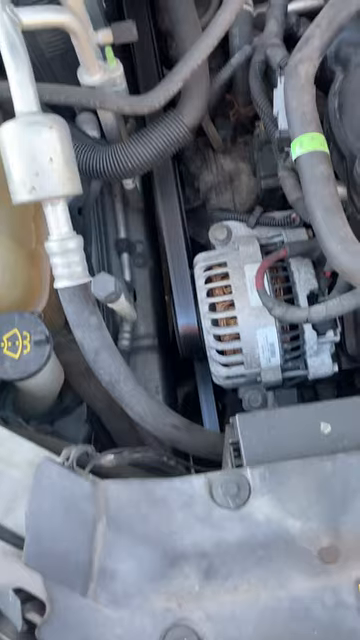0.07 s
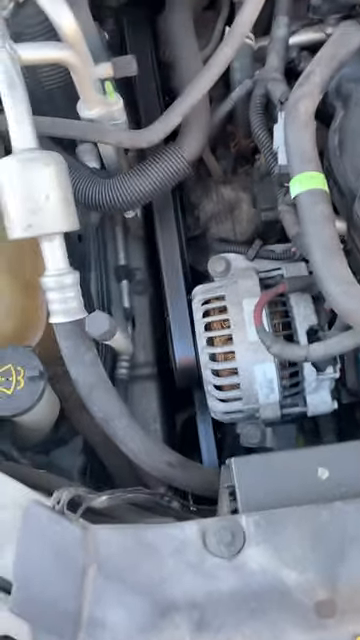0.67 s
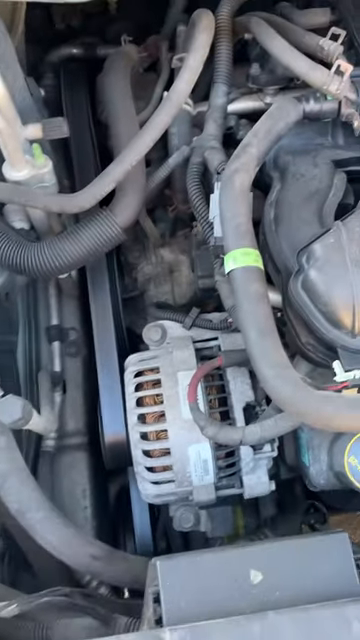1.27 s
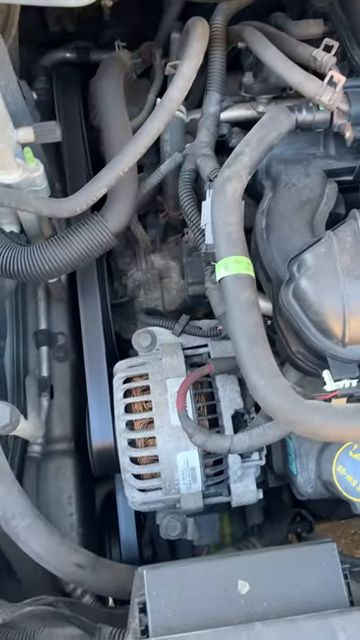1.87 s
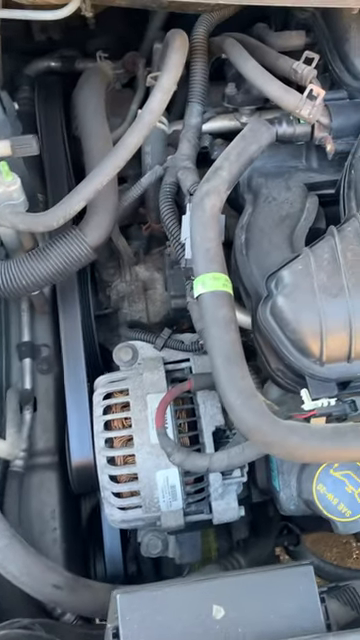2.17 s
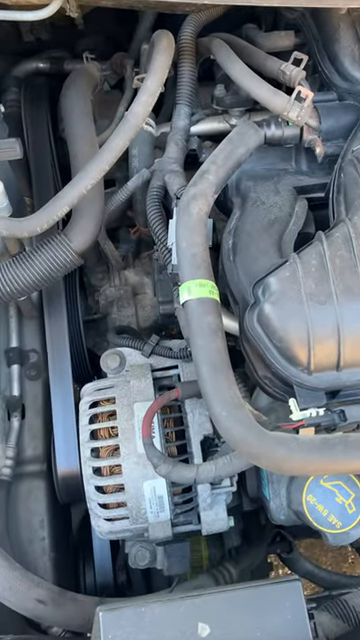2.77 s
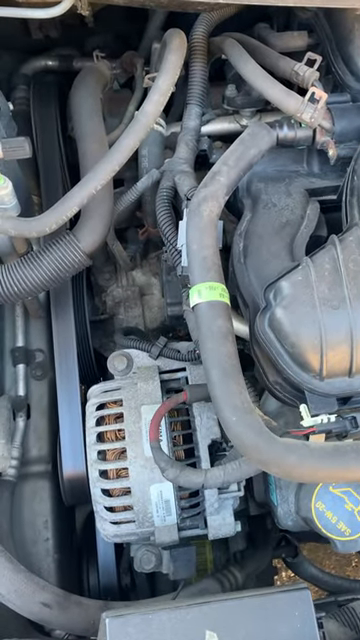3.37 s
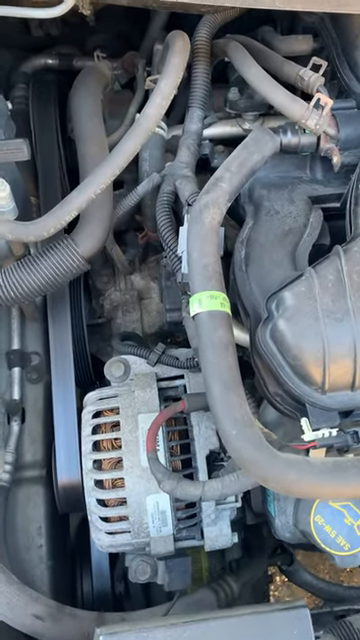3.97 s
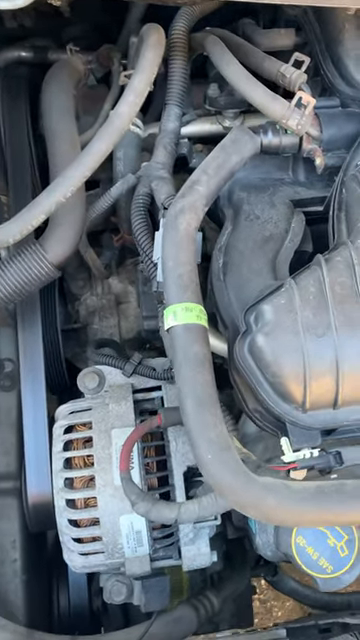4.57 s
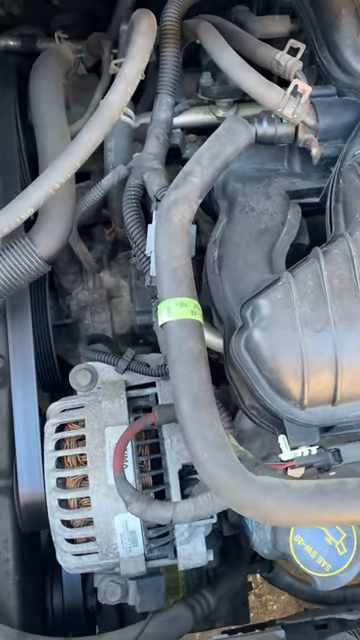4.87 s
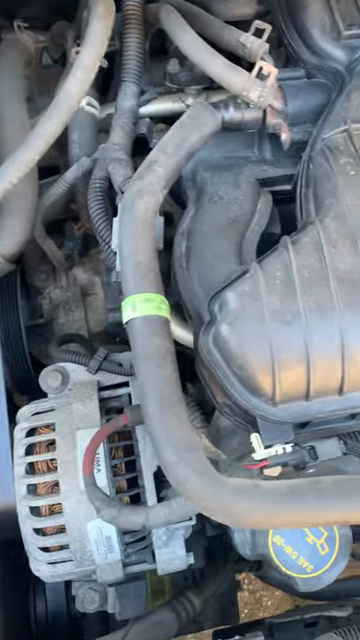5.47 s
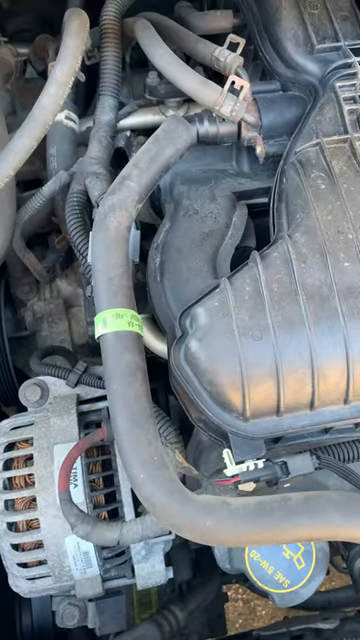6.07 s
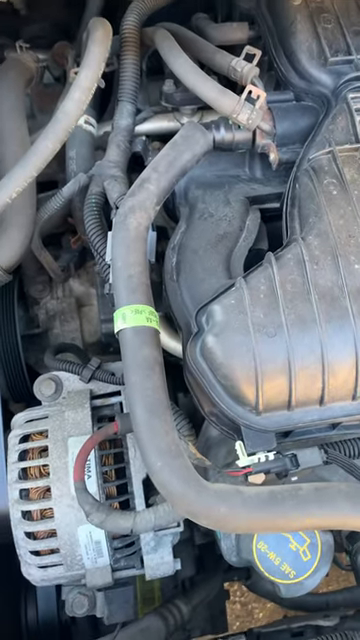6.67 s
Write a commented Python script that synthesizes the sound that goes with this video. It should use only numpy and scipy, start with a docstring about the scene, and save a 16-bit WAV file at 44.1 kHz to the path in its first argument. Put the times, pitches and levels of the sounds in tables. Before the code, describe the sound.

Close under an open hood, an idling engine knocks fast and evenly, with rhythmic belt chirps, occasional squeaks and a low fan hum.

```python
"""Idling engine with a chirping belt

A car engine idles under its open hood, heard from just above the belt drive. It knocks once per
crank turn, dull and hard strokes in turn, and each knock makes the engine block ring. In bouts the
rubber belt slips and chirps after each hard stroke, and now and then it squeaks. Behind this a
cooling fan hums and slows a little, and valves tick inside the steady rush of the engine."""
import sys
import numpy as np
from scipy import signal
from scipy.fft import rfft, irfft
from scipy.io import wavfile
from scipy.ndimage import uniform_filter1d

SR = 44100
rng = np.random.default_rng(int(sys.argv[2]) if len(sys.argv) > 2 else 0)


def to_wav(s):
    """Save 16-bit WAV."""
    ch = np.atleast_2d(s).T  # columns
    pcm = np.round(np.clip(ch, -1, 1) * 32767)  # PCM
    wavfile.write(sys.argv[1], SR, pcm.astype(np.int16))


N = 296352
TIME = np.arange(N) / SR
SPECTRUM_HZ = np.arange(N // 2 + 1) * SR / N
CUTOFF_HZ = 16000


def from_db(db):
    """Turn decibels into a factor to multiply by."""
    return 10 ** (np.asarray(db) / 20)


def unit_power(x):
    """Scale a signal to an average power of 1."""
    return x / np.sqrt(np.mean(x ** 2) + 1e-20)


def over_time(rows):
    """Join a table's timed points with straight lines: one curve per column."""
    times, *columns = np.transpose(rows)
    return [np.interp(TIME, times, column) for column in columns]


def at_hz(points, hz):
    """Read a table between its frequencies, giving each octave equal room."""
    known_hz, values = np.transpose(points)
    return np.interp(np.log(np.maximum(hz, 1)), np.log(known_hz), values)


def drift(rate_hz):
    """A smooth random wobble of about size 1."""
    pole = np.exp(-40 * np.pi * rate_hz / SR)
    white = rng.standard_normal(N // 20 + 4002)
    slow = signal.lfilter([1], [1, -2 * pole, pole * pole], white)[4000:]
    return np.interp(np.arange(N) / 20, np.arange(len(slow)), unit_power(slow))


def add(track, start_s, sound):
    """Mix a sound into a track."""
    start = int(np.clip(start_s * SR, 0, N - 1))
    track[..., start:start + sound.shape[-1]] += sound[..., :N - start]


def swell(t, rise_s, fade_s):
    """A loudness shape with energy 1 that builds up, then falls 60 dB every fade_s."""
    shape = (1 - np.exp(-t / rise_s)) * from_db(-60 * t / fade_s)
    return shape / np.sqrt(np.sum(shape ** 2, axis=-1, keepdims=True))


# How alike noise is on the left and right (1 = the same): frequency_hz, likeness
STEREO_LIKENESS = [(60, 0.87), (250, 0.91), (600, 0.74), (1200, 0.66), (2500, 0.12), (4500, 0.98),
                   (15000, 1)]
def noise(spectrum):
    """Stereo noise shaped by a table of frequency_hz, level_db, then scaled to power 1."""
    alike = np.clip(at_hz(STEREO_LIKENESS, SPECTRUM_HZ), 0, 1)
    bass_cut = np.minimum(SPECTRUM_HZ / spectrum[0][0], 1) ** 2
    shared, side = rfft(rng.standard_normal((2, N))) * from_db(at_hz(spectrum, SPECTRUM_HZ)) * bass_cut
    return unit_power(irfft(np.sqrt(1 + alike) * shared + np.sqrt(1 - alike) * side * [[1], [-1]], N))


# A passing tone: time_s, pitch_hz, level_db
PASSING_HUM = [(3.8, 352, -77), (4.0, 356.5, -41), (4.25, 353.4, -38), (4.6, 339, -72)]
def brief_hum():
    """A faint hum surfaces for a moment."""
    hz, db = over_time(PASSING_HUM)
    return from_db(db) * np.sin(2 * np.pi * np.cumsum(hz) / SR)


# Two light bumps: start_s, pitch_hz, level_db
HOLLOW_TAPS = [(.421, 553, -16.5), (0.608, 504, -25)]
def taps(fade_s=0.031):
    """A hollow part is bumped and rings briefly."""
    t, out = np.arange(SR // 10) / SR, np.zeros(N)
    for start_s, hz, db in HOLLOW_TAPS:
        add(out, start_s, from_db(db - 60 * t / fade_s) * np.sin(2 * np.pi * hz * t))
    return out


# How fast the fan spins: time_s, turns_per_s
FAN_SPIN = [(0, 16.36), (1, 16.22), (1.6, 16.23), (2.1, 16.16), (2.35, 15.84), (2.6, 15.4), (2.85, 14.88),
            (3.1, 14.6), (3.5, 14.22), (4, 14.08), (4.6, 13.84), (5.2, 13.77), (6.72, 13.77)]
# The blade tone, at 9 times the fan's speed: time_s, level_db
BLADE_TONE = [(0.0, -45.5), (0.1, -33), (0.5, -49), (1.0, -48), (1.1, -31), (1.4, -23.0), (1.7, -26.5),
              (1.8, -38), (2.1, -21), (2.3, -27.5), (2.5, -18.0), (2.6, -29.5), (3.0, -20.5), (3.4, -32.5),
              (3.9, -27), (4.6, -28), (5.0, -32.5), (6.72, -36.5)]
# Strong tones at 6, 12 and 14 times its speed: time_s, sixth_db, twelfth_db, fourteenth_db
STRONG_TONES = [(0.0, -48.5, -38, -45.5), (0.5, -51, -53, -53.5), (1.2, -42.5, -27, -45),
                (1.7, -31.5, -34, -30), (2.0, -37, -25, -31.5), (2.2, -31.5, -27.5, -36.0),
                (2.8, -26, -25.5, -29.5), (3.0, -41, -28.5, -31.5), (3.3, -36.5, -31.5, -35.5),
                (3.7, -32.5, -33.5, -58), (4.1, -33.5, -45, -51), (4.6, -30.5, -33.0, -35.5),
                (4.7, -35.0, -34.5, -67), (5.1, -43.5, -37.5, -45), (5.6, -40.0, -49.5, -52),
                (6.72, -42.0, -45.5, -50)]
# Weak tones, compared with the twelfth: speed_multiple, level_db
WEAK_TONES = [(3, -18), (7, -18), (8, -19), (10, -16), (11, -7)]
# The whine at 20 times the fan's speed: time_s, level_db
FAN_WHINE = [(0.0, -56), (0.8, -56.5), (1.1, -40), (2.2, -45.5), (2.5, -52.5), (3.4, -48), (3.9, -44.5),
             (6.72, -70)]
# The tones of the whine, compared with that level: speed_multiple, level_db
WHINE_TONES = [(18, -3), (19, -22), (20, 0), (21, -5), (23, -10)]
# How strongly the air is churned: time_s, level_db
AIR_LEVEL = [(0.0, -34.5), (0.8, -47), (1.1, -32.5), (2.7, -33), (4.3, -31), (4.8, -37), (5.9, -36.5),
             (6.72, -39.5)]
# The low rumble of that air: frequency_hz, level_db
AIR_SPECTRUM = [(25, -42), (45, -40), (70, -0.5), (110, 2.5), (190, 2.5), (250, -4.5), (340, -24.5),
                (500, -17.5), (900, -39.5)]
def fan(thirteenth_db=-3, air_gain_db=-1, waver_db=1):
    """Nine unevenly spaced blades churn the air and hum at multiples of the fan's speed."""
    blade, whine, air = [over_time(curve)[0] for curve in (BLADE_TONE, FAN_WHINE, AIR_LEVEL)]
    sixth, twelfth, fourteenth = over_time(STRONG_TONES)
    angle = 2 * np.pi * np.cumsum(over_time(FAN_SPIN)[0]) / SR
    tones = [(6, sixth), (9, blade), (12, twelfth), (13, fourteenth + thirteenth_db), (14, fourteenth)]
    tones += [(multiple, twelfth + db) for multiple, db in WEAK_TONES]
    tones += [(multiple, whine + db) for multiple, db in WHINE_TONES]
    hum = 0
    for multiple, db in tones:
        level = np.sqrt(2) * from_db(db + waver_db * drift(4.2))
        hum += level * np.sin(multiple * angle + rng.uniform(0, 2 * np.pi))
    return hum + from_db(air + air_gain_db) * noise(AIR_SPECTRUM)


# The slightly unsteady speed of the crank, the engine's main shaft: time_s, turns_per_s
IDLE_SPEED = [(0.0, 12.101), (0.98, 11.586), (1.12, 11.974), (1.74, 11.622), (2.86, 12.013), (3.18, 11.346),
              (4.06, 12.267), (4.34, 11.31), (4.52, 11.98), (4.72, 11.635), (4.9, 12.377), (5.08, 11.756),
              (5.24, 12.055), (5.38, 11.878), (6.06, 11.957), (6.24, 11.272), (6.36, 11.955),
              (6.72, 11.714)]
def crank_turns(first_knock_s=.0272):
    """Count the crank's turns from the first knock."""
    turns = np.cumsum(over_time(IDLE_SPEED)[0]) / SR
    return turns - np.interp(first_knock_s, TIME, turns)


def every_second_turn(first_turn):
    """Times two crank turns apart: start at 0 for dull strokes, at 1 for hard ones."""
    turns = crank_turns()
    return np.interp(np.arange(first_turn, turns[-1], 2), turns, TIME)


# Tones of the firing cylinders, compared with the rush: crank_speed_multiple, level_db
FIRING_TONES = [(3, -28), (4, -22), (4.5, -22), (6, -14), (7.5, -19), (9, -22), (10.5, -20)]
# The hiss of the rush and the valves: frequency_hz, level_db
RUSH_SPECTRUM = [(300, -8), (420, -9), (600, -6), (900, -5.5), (1250, -1), (2200, -8.5), (3200, -4.5),
                 (4700, -9.5), (5800, -6), (6900, -11.5), (8600, -6.5), (11300, -13), (13300, -13),
                 (15500, -16.5)]
# Loudness of the rush, which hum and ticks follow: time_s, level_db
RUSH_LEVEL = [(0.2, -29), (0.75, -34), (1.2, -27.5), (3.4, -31), (5.2, -30.5), (6.72, -30.5)]
def engine_rush(valve_db=-11, valve_decay=17, flicker_db=2):
    """Firing hum and a steady rush, with soft valve ticks four times a turn."""
    turns, hum = crank_turns(), 0
    for multiple, db in FIRING_TONES:
        level = np.sqrt(2) * from_db(db + 2 * drift(2.6))
        hum += level * np.sin(2 * np.pi * multiple * turns + rng.uniform(0, 2 * np.pi))
    since_tick = (4 * turns) % 1
    valves = from_db(valve_db + 1.6 * drift(13)) * np.exp(-valve_decay * since_tick) * noise(RUSH_SPECTRUM)
    rush = from_db(flicker_db * drift(18.7)) * noise(RUSH_SPECTRUM)
    return from_db(over_time(RUSH_LEVEL)[0]) * (hum + rush + valves)


CHIRP_HZ = 2547
# Spells when the belt slips at every hard stroke: start_s, end_s, chirp_length_s, level_db
SLIP_BOUTS = [(0.05, .55, 0.057, -25.5), (.9, 1.2, 0.037, -40), (1.25, 2.25, 0.055, -25.5),
              (2.28, 3.1, 0.062, -23.5), (3.3, 3.8, 0.054, -25.5), (4.3, 5.0, 0.06, -27),
              (5.65, 6.72, 0.066, -24)]
# Hard slips that squeak: start_s, length_s, pitch_hz, level_db
BELT_SQUEAKS = [(0.624, 0.07, 2016, -19.5), (3.173, 0.048, 2290, -21), (3.869, 0.069, 2042, -21),
                (4.019, 0.05, 2128, -22), (5.037, 0.055, 2040, -18.5), (6.396, 0.059, 2050, -23)]
def slips(delay_s=.01, chirp_rise=.17, squeak_rise=.0221, squeak_looseness=.58):
    """List each slip: start_s, length_s, pitch_hz, rise (share of pitch), level_db, looseness (0-1)."""
    jolts, rows = every_second_turn(0.98), []   # right at the start of each hard stroke
    spread = [.004, 35, .0343, 1.44]   # length_s, pitch_hz, rise, level_db
    variations = rng.standard_normal((len(jolts), 4)) * spread
    for jolt_s, variation in zip(jolts, variations):
        for start_s, end_s, length_s, db in SLIP_BOUTS:
            if start_s < jolt_s < end_s:
                chirp = variation + [length_s, CHIRP_HZ, chirp_rise, db]
                rows.append((jolt_s + delay_s, *chirp, 1))
    for start_s, length_s, hz, db in BELT_SQUEAKS:
        rows.append((start_s, length_s, hz, squeak_rise, db, squeak_looseness))
    return rows


# The tone colour of the chirps and squeaks as heard: frequency_hz, level_db
CHIRP_SPECTRUM = [(1500, -30), (2100, -11.5), (2700, 3.5), (3500, 3.5), (4100, -6.5), (4900, 2),
                  (6000, -6.5), (7000, -6.5), (8500, 9.5), (10000, 0), (11500, -11.5), (15500, -10.5)]
# The sizzle of hard rubbing: frequency_hz, level_db
SIZZLE_SPECTRUM = [(4000, -12), (6000, 8), (8500, -7), (11500, -0.5), (15500, -3)]
def belt(gain_db=-0.5, edge_s=.012, rib_split_hz=130, throb_db=4.5, judder_db=1.03):
    """Rubber sticks and slips on a pulley: light slips rasp and rise, hard ones hold steadier and sizzle."""
    level, pitch, loose = np.zeros(N), np.full(N, float(CHIRP_HZ)), np.ones(N)
    for start_s, length_s, hz, rise, db, looseness in slips():
        span = slice(max(int((start_s - edge_s) * SR), 0), int((start_s + length_s + edge_s) * SR))
        t = TIME[span] - start_s
        level[span] += from_db(db) * np.clip(np.minimum(t, length_s - t) / edge_s + .5, 0, 1)
        pitch[span] = hz * (1 + rise * (t / length_s - .5))
        loose[span] = looseness
    tone = 0
    db_per_harmonic = -4 * (1 - loose) - 2 * loose
    # Two ribs of the belt slip unevenly, each on its own, which frays the tone.
    for rib_hz in (-rib_split_hz, rib_split_hz):
        sway = .024 * drift(89.8)
        for harmonic in range(1, 8):
            wander = .058 * drift(390) / harmonic + sway / np.sqrt(harmonic)
            hz = harmonic * pitch * (1 + loose * wander) + loose * rib_hz
            db = at_hz(CHIRP_SPECTRUM, harmonic * pitch) + harmonic * db_per_harmonic
            db += throb_db * drift(71)
            tone += from_db(db) * (hz < CUTOFF_HZ) * np.sin(2 * np.pi * np.cumsum(hz) / SR)
    tone /= np.sqrt(uniform_filter1d(tone ** 2, size=SR // 25) + 1e-12)   # even out the loudness
    rasp = from_db(-3) * np.sqrt(loose) * noise(CHIRP_SPECTRUM)
    sizzle = from_db(2) * (1 - loose) * noise(SIZZLE_SPECTRUM)
    return level * from_db(gain_db + judder_db * drift(65)) * (tone + rasp + sizzle)


DULL, HARD = 0, 1
# Strength of the knocks: time_s, dull_db, hard_db
STROKE_LEVEL = [(0.1, -19, -16.5), (.55, -20, -19), (.85, -17, -21.5), (1.05, -14.5, -14.5),
                (2.4, -15, -16.6), (3.1, -16.5, -17.5), (4.1, -17, -17.5), (5.5, -15.5, -17),
                (6.72, -15, -18)]
def strokes(kind, vary_db=0.06):
    """List the strokes of one kind: start_s, level_db."""
    times = every_second_turn(kind)
    db = np.interp(times, TIME, over_time(STROKE_LEVEL)[kind])
    return np.column_stack([times, db + vary_db * rng.standard_normal(len(times))])


# The tones the engine block rings with: pitch_hz, dull_db, hard_db
BLOCK_TONES = [(883, -2, -7), (1044, -4, -12), (1120, -4, -9), (1200, 0, -3), (1244, -5, -6),
               (1330, -5, -6), (1416, -9, -6), (1497, -13, -6), (1588, -9, -10), (1637, -8, -8),
               (1680, -11, -10), (1723, -11, -8), (1760, -13, -9), (1825, -2, -1), (2062, -12, -12),
               (2223, -11, -5), (2315, -4, -4), (2417, -7, -5), (2595, -6, -9), (2735, -12, -11),
               (3009, -6, -4), (3106, -9, -11), (3225, -8, -7), (3451, -13, -11), (3623, -7, -5),
               (3941, -11, -12)]
# How well low tones reach the listener, who moves over the engine: time_s, boost_at_1khz_db
LOW_TONE_REACH = [(0, -3), (.8, -0.5), (1.3, 0.5), (2.6, 1.5), (4, 1), (5.501, 2), (6.72, 2)]
def block_ring(kind, hits, gain_db, fade_s, rise_s, lag_s, travel_s=.000856, presence_hz=1900, vary_db=1.5):
    """Strokes ring the block; low bending waves arrive later, build more slowly and last longer."""
    t, tones = np.arange(SR // 8) / SR, np.array(BLOCK_TONES)
    hz = tones[:, :1]
    khz = hz / 1000   # fade_s, rise_s and lag_s hold for a tone at 1 kHz
    age = np.maximum(t - travel_s - lag_s / khz ** 7.82, 0)   # time since reaching the outer walls
    envelope = swell(age, rise_s / khz ** 2, fade_s / khz ** 0.043)
    rings = envelope * np.exp(2j * np.pi * hz * age)
    stereo_phase = rng.uniform(0, 2 * np.pi, len(hz)) + 0.56 * rng.standard_normal((2, len(hz)))
    level_scatter, phase_scatter = rng.standard_normal((2, len(hits), len(hz)))
    reach_db = np.interp(hits[:, :1], *np.transpose(LOW_TONE_REACH)) / khz.T ** 4
    presence_db = 1 / (1 + (8 * np.log(hz.T / presence_hz)) ** 2)   # a little stronger around 1.9 kHz
    tone_db = tones[:, 1 + kind] + reach_db + presence_db + vary_db * level_scatter
    strengths = from_db(tone_db) * np.exp(0.58j * phase_scatter)
    out = np.zeros((2, N))
    for (start_s, db), strength in zip(hits, strengths):
        ring = ((strength * np.exp(1j * stereo_phase)) @ rings).real   # add up all the tones
        add(out, start_s, from_db(db + gain_db) * unit_power(ring))
    return out


# The rattle of metal hitting metal: frequency_hz, level_db
CONTACT_SPECTRUM = [(400, -11), (700, -13.5), (1100, -23.5), (1800, 6), (2600, -2), (3600, 0), (4900, 1),
                    (5800, -2), (6900, -12.5), (8600, -2), (11300, -15), (15000, -17)]
def contact_crack(hits, gain_db, fade_s, lowpass_hz, snap_db=-np.inf, rise_s=.0014, alike=.7):
    """The contact: a dense metallic burst, much the same each turn, scatters round the engine bay."""
    t, out = np.arange(SR // 10) / SR, np.zeros((2, N))
    lowpass = signal.butter(1, lowpass_hz, fs=SR, output="sos")
    grit = unit_power(signal.sosfilt(lowpass, noise(CONTACT_SPECTRUM)))
    snap = from_db(snap_db) * swell(t, rise_s, fade_s=.02)
    shape = unit_power((1 - np.exp(-t / rise_s)) * (swell(t, rise_s, fade_s) + snap))
    repeated = np.sqrt(alike) * grit[:, :len(t)]
    for k, (start_s, db) in enumerate(hits, 1):
        fresh = np.sqrt(1 - alike) * grit[:, k * len(t):(k + 1) * len(t)]
        burst = from_db(db + gain_db) * shape * (repeated + fresh)
        add(out, start_s - .000988, burst)   # just ahead of the ring
    return out


def knocks():
    """Each knock is a crack and a ring: dull strokes ring lower, hard strokes snap."""
    dull_hits, hard_hits = strokes(DULL), strokes(HARD)
    dull = block_ring(DULL, dull_hits, gain_db=-12, fade_s=0.091, rise_s=0.00035, lag_s=0.00264)
    dull += contact_crack(dull_hits, gain_db=-13, fade_s=0.079, lowpass_hz=5100)
    hard = block_ring(HARD, hard_hits, gain_db=-11.5, fade_s=0.098, rise_s=0.0018, lag_s=0.004)
    hard += contact_crack(hard_hits, gain_db=-9.5, fade_s=0.085, lowpass_hz=8800, snap_db=-5)
    return dull + hard


# How far the left side is ahead of the right: frequency_hz, lead_radians
LEFT_LEAD = [(0, 0), (1290, -0.5), (2500, 2.0), (3790, 1.7), (6370, 5.9), (7490, 6.7), (8350, 9.2),
             (9560, 9.7), (10400, 12.5), (11600, 12.6), (12500, 15.7), (13700, 15.6), (14600, 18.8),
             (16600, 18.9)]
# How much louder the left side is: frequency_hz, left_minus_right_db
LEFT_BALANCE = [(60, 0.5), (99, 1.0), (160, 1.5), (270, 0.5), (450, 0.0), (740, -1.0), (1220, -1.5),
                (2010, -4.0), (3330, -0.5), (5500, 0.0), (9080, 0.0), (15000, 0.0)]
def scene():
    """Mix all the sources; the sound reaches the left a little before the right."""
    mix = knocks() + belt() + fan() + brief_hum() + engine_rush() + taps()
    sides = np.array([[.5], [-.5]])
    balance = from_db(at_hz(LEFT_BALANCE, SPECTRUM_HZ) * sides)
    lead = np.interp(SPECTRUM_HZ, *np.transpose(LEFT_LEAD)) * sides
    return irfft(rfft(mix) * balance * np.exp(1j * lead), N)


def record(dry, start_s=.035):
    """The sound starts after a moment of silence, with the highest treble cut off."""
    lowpass = signal.ellip(12, .2, 80, CUTOFF_HZ, fs=SR, output="sos")
    return signal.sosfilt(lowpass, dry * (TIME >= start_s))


dry = scene()
out = record(dry)
to_wav(out)
```